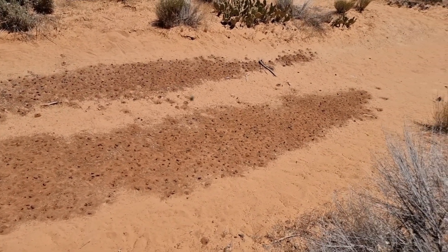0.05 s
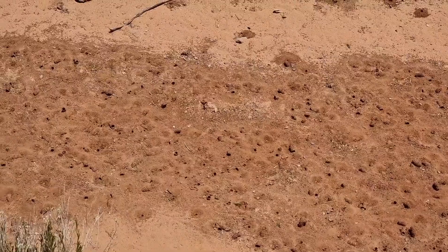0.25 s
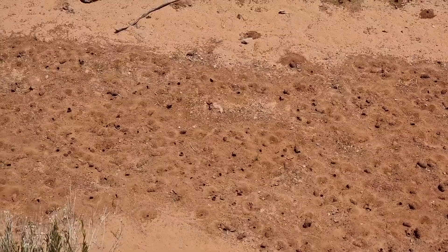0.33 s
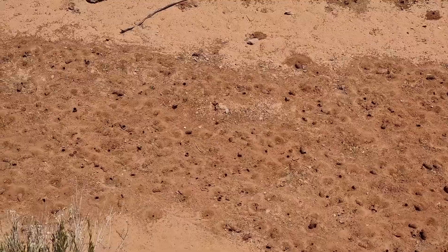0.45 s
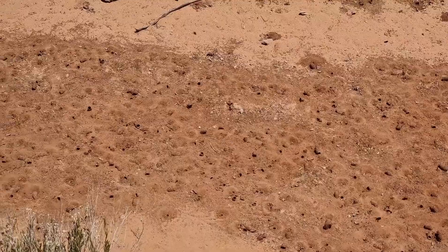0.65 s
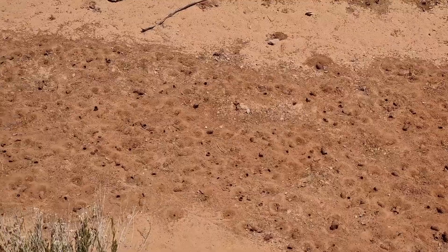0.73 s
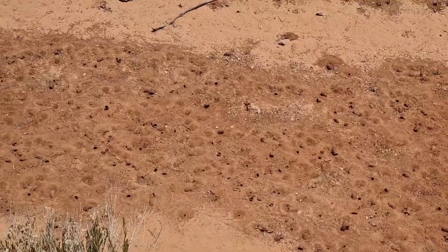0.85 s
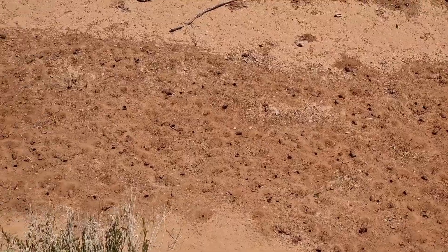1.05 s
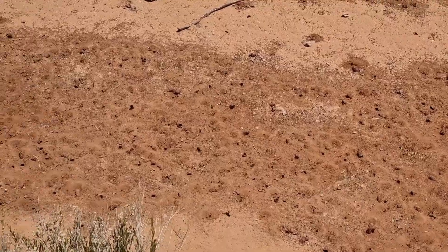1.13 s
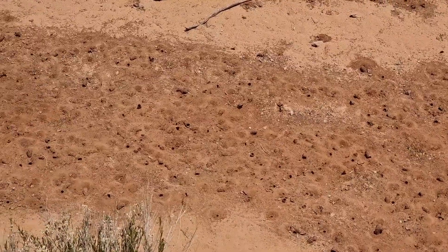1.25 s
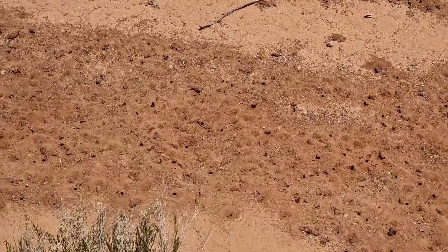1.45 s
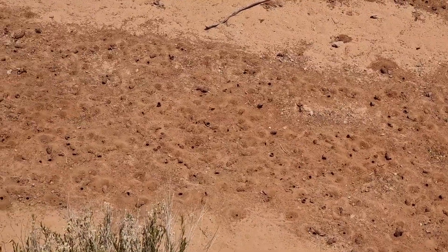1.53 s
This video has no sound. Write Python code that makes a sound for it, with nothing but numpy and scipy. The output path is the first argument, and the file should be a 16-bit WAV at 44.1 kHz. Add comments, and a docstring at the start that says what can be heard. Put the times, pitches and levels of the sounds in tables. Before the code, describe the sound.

Wind buffets the microphone in open desert, starting after a small click. The gust brings deep thumps and a faint dry rustle, then ebbs to a low flutter. A distant engine, probably a propeller plane, drones under soft hiss.

```python
"""Open desert. At first there is only the microphone's hiss, a soft rush of air and the far drone of
an engine, probably a propeller aircraft. Then a cut, with a small click, jumps into wind.
A gust buffets both microphone ports (the openings that let sound in) and overloads them,
with deep thumps and a faint rustle. At last it ebbs to a low flutter while the engine drones on."""
import sys
import numpy as np
from scipy.fft import rfft, irfft, next_fast_len
from scipy.io import wavfile
from scipy.ndimage import uniform_filter1d, map_coordinates

SR = 44100
rng = np.random.default_rng(int(sys.argv[2]) if len(sys.argv) > 2 else 0)


def log_audio(samples):
    """Write samples as a 16-bit WAV file to the path given in sys.argv[1]."""
    # one column per channel
    frames = np.atleast_2d(samples).T
    # limit to full scale, then quantise
    limited = np.clip(frames, -1, 1)
    pcm = np.round(limited * 32767).astype(np.int16)
    wavfile.write(sys.argv[1], SR, pcm)


N = 70560
CUT_S = 0.1662


def amp(db):
    """Turn decibels into a number to multiply by."""
    return 10 ** (np.asarray(db) / 20)


def times():
    """The time of each sample, in seconds."""
    return np.arange(N) / SR


def along(points, hz):
    """Read a value between (pitch_hz, value) points, on a log pitch scale."""
    pitches, values = np.transpose(points)
    return np.interp(np.log(hz + 1), np.log(pitches + 1), values)


def curves(rows):
    """Join timed rows with straight lines: one curve for each column after the time."""
    time_s, *columns = np.transpose(rows)
    return [np.interp(times(), time_s, column) for column in columns]


def bump(peak_s, half_length_s):
    """A bell-shaped swell."""
    return np.exp(-.5 * ((times() - peak_s) / half_length_s) ** 2)


def wobble(rate_hz):
    """A smooth random curve for each side, through rate_hz points a second."""
    points = rng.standard_normal((2, 512))
    return np.array([map_coordinates(row, [times() * rate_hz], mode="wrap") for row in points])


def panned(pan_db):
    """Share a sound between the sides; pan_db is the left level minus the right."""
    pair = amp(np.array([[.5], [-.5]]) * pan_db)
    return pair / np.sqrt(np.mean(pair ** 2, axis=0))


def filtered(sound, gain_at):
    """Turn each pitch in a sound up or down by gain_at(hz)."""
    size = next_fast_len(N + SR // 2)
    return irfft(rfft(sound, size) * gain_at(np.fft.rfftfreq(size, 1 / SR)), size)[..., :N]


def noise(gain_at, alike=0):
    """Stereo noise of strength 1; alike runs from 0 (unrelated sides) to 1 (the same)."""
    shared, opposed = filtered(rng.standard_normal((2, N)), gain_at)
    turn = np.arccos(np.clip(alike, -1, 1)) / 2
    pair = np.cos(turn) * shared + np.array([[1], [-1]]) * np.sin(turn) * opposed
    return pair / np.sqrt(np.mean(pair ** 2) + 1e-20)


def turbulence(tone, window_samples, alike=0):
    """Churning air at each port: noise with its loudness evened out."""
    churn = noise(lambda hz: amp(along(tone, hz)), alike)
    power = uniform_filter1d(uniform_filter1d(churn ** 2, window_samples), window_samples)
    return churn / np.sqrt(np.abs(power) + 1e-9)


# Tone of the hiss: pitch_hz, relative_db
HISS_TONE = [(500, -5), (3000, 0), (4800, -2), (6700, -1), (8800, -4.5), (10000, -13), (11200, -10),
             (12700, -4), (15500, -3.5)]
# The hiss leans slightly right: pitch_hz, pan_db
HISS_BALANCE = [(3000, -0.5), (7000, -0.5), (10000, 0), (15000, -0.5)]
def hiss(base_db=-46, before_cut_db=-2, drift_db=0.58):
    """The microphone's own noise, a little quieter before the cut."""
    level_db = base_db + before_cut_db * (times() < CUT_S) + drift_db * wobble(7.6)
    return amp(level_db) * noise(lambda hz: amp(along(HISS_TONE, hz)) * panned(along(HISS_BALANCE, hz)))


# Tone of the far rush of air and engine: pitch_hz, relative_db
AIR_TONE = [(25, -20), (55, -5), (88, 13), (130, -29), (280, -2.5), (370, 6), (470, -3), (1100, -4.5),
            (1800, -8), (2800, -20.5), (6000, -38.5)]
# Tone of the extra rush before the cut: pitch_hz, relative_db
EARLY_AIR_TONE = [(500, -22), (1100, 1), (2000, -10), (2900, -28), (5000, -43)]
def air():
    """The soft rush of open land, a little brighter before the cut."""
    steady = amp(-42.5) * panned(-4.5) * noise(lambda hz: amp(along(AIR_TONE, hz)), alike=0.067)
    early = amp(-49) * panned(-6) * noise(lambda hz: amp(along(EARLY_AIR_TONE, hz)))
    return steady + early * (times() < CUT_S)


# The engine's tones before the swell is applied: blade_rate_multiple, level_db
ENGINE_TONES = [(1, -44), (2, -42), (3, -52), (4, -52.5), (5, -51.5), (6, -55), (7, -64)]
# The drone grows, then holds: time_s, gain_db
ENGINE_SWELL = [(0, -4.5), (.8, 1), (1.6, 1)]
def engine(blade_hz=194.1):
    """Propeller tones, smeared into narrow bands of noise by their long path through moving air."""
    def bands(hz):
        power = 0
        for multiple, db in ENGINE_TONES:
            width_hz = 11.5 + 4 * multiple  # higher tones smear more
            band = np.exp(-.5 * ((hz - multiple * blade_hz) / width_hz) ** 2)
            power = power + amp(db) ** 2 / width_hz * band
        return np.sqrt(power)
    gain_db, = curves(ENGINE_SWELL)
    strength = np.linalg.norm([amp(db) for _, db in ENGINE_TONES])
    return strength * amp(gain_db) * noise(bands, alike=0.83)


# Tone of the rustle: pitch_hz, relative_db
RUSTLE_TONE = [(2000, -24), (3200, -2.5), (4200, 7.5), (5200, -2.5), (6800, -0.5), (9000, -18),
               (12000, -33)]
def rustle():
    """A faint dry rustle, perhaps grass in the gust, swells and fades."""
    swell = bump(peak_s=0.62, half_length_s=0.17) * amp(-52 + 1.5 * wobble(40))
    return swell * panned(-4) * noise(lambda hz: amp(along(RUSTLE_TONE, hz)))


def click(rise_s=0.00005, decay_s=0.0022):
    """A small click at the cut where the windy shot begins."""
    age_s = np.maximum(times() - CUT_S, 0)
    return -amp(-22) * (1 - np.exp(-age_s / rise_s)) * np.exp(-age_s / decay_s)


# Deep shoves of air: peak_s, level_db, half_length_s
THUMPS = [(0.483, -5.5, 0.012), (0.932, -10, 0.025)]
# Tone of a thump: pitch_hz, relative_db
THUMP_TONE = [(20, -16), (40, -1.5), (56, 3.5), (75, -2), (130, -41), (400, -91)]
def thumps():
    """Large swirls of air push on both ports at once."""
    swell = sum(amp(db) * bump(peak_s, half_s) for peak_s, db, half_s in THUMPS)
    return swell * turbulence(THUMP_TONE, window_samples=1500, alike=0.73)


# Sharp hits within the gust: peak_s, level_db, pan_db, half_length_s
SLAPS = [(0.298, -17, -14, 0.002), (0.367, -14, 9, 0.013), (0.406, -13.5, -9, 0.03),
         (0.454, -17, -6.5, .008), (0.522, -14, -7.5, .007), (0.55, -14, -15, 0.0077),
         (0.567, -7, 5.5, 0.0057), (0.597, -18, -5, 0.0085), (.702, -12.5, -13, 0.0044),
         (0.724, -21.5, -7, 0.0089), (0.818, -16, -19, 0.0048), (0.856, -21, 1, 0.0049)]
# Tone of a slap: pitch_hz, relative_db
SLAP_TONE = [(50, -19), (120, 3.5), (220, 1), (350, -10), (600, -21.5), (1200, -39), (2200, -47),
             (5000, -66.5)]
def slaps():
    """Brief, hard slaps of air hit the ports at the height of the gust."""
    swell = sum(amp(db) * panned(pan_db) * bump(peak_s, half_s) for peak_s, db, pan_db, half_s in SLAPS)
    return swell * turbulence(SLAP_TONE, window_samples=500)


# Wind strength at the ports: time_s, relative_db, pan_db
GUST = [(0.17, -30.5, 1), (0.252, -15, -2.0), (0.268, -18.5, -4.5), (0.344, -6, 2), (0.436, -8, -5),
        (0.464, -7, -3.0), (0.516, -6.5, -0.5), (0.536, -10, -4), (0.572, -20.5, 18), (0.596, -8.5, -5),
        (0.75, -8.5, -4.5), (0.778, -12.5, -11.5), (0.806, -6, -10), (0.89, -17.5, -12.5),
        (0.914, -14, -4.5), (0.938, -13, -6), (0.97, -20.5, -3.5), (0.994, -21.5, 9), (1.03, -24, 1),
        (1.05, -27, 7.5), (1.212, -28, 12.5), (1.256, -29.5, -4), (1.312, -32, 11), (1.416, -30, 13),
        (1.496, -23, -8.5), (1.532, -30.5, -0.5), (1.6, -25.5, 3.5)]
# Tone of the slow pressure swings: pitch_hz, relative_db
RUMBLE_TONE = [(10, -35), (22, -13), (35, -4.5), (62, 2.5), (82, -1.5), (100, -7), (125, -22.5),
               (160, -21.5), (250, -39), (500, -59), (1500, -100)]
# Tone of the small swirls: pitch_hz, relative_db
SWIRL_TONE = [(40, -26), (95, 5), (150, -1), (250, -16.5), (400, -27.5), (700, -36), (1500, -41.5),
              (4000, -67.5)]
def wind(strong_db=-13, rumble_boost_db=4, swirl_growth=1.45, flutter_db=5):
    """Wind on the ports makes a rumble, plus small swirls that grow faster than the wind does."""
    strength_db, pan_db = curves(GUST)
    over_db = strength_db - strong_db
    surge_db = 0.05 * np.maximum(over_db, 0)  # strong wind pushes a little extra
    rumble_db = strength_db + rumble_boost_db + surge_db
    rumble = amp(rumble_db) * turbulence(RUMBLE_TONE, window_samples=1500)
    swirl_db = -23 + swirl_growth * over_db + flutter_db * wobble(45.11)
    swirls = amp(swirl_db) * turbulence(SWIRL_TONE, window_samples=1600)
    return (rumble + swirls) * panned(pan_db) * (times() >= CUT_S)


def scene():
    """The close gust and the quiet background, added together."""
    return wind() + slaps() + click() + rustle() + engine() + air() + hiss() + thumps()


def record(dry, hardness=10, top_hz=15750):
    """The overloaded microphone flattens peaks near full scale (1); pitches above top_hz are cut."""
    flattened = dry / (1 + np.abs(dry) ** hardness) ** (1 / hardness)
    return filtered(flattened, lambda hz: hz < top_hz)


dry = scene()
out = record(dry)
log_audio(out)
```